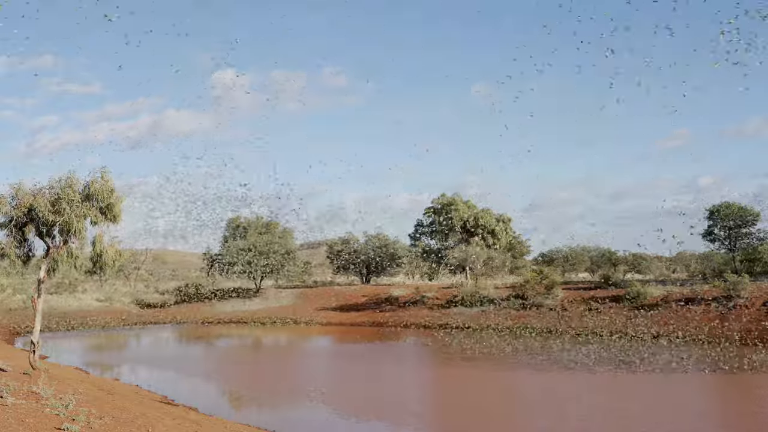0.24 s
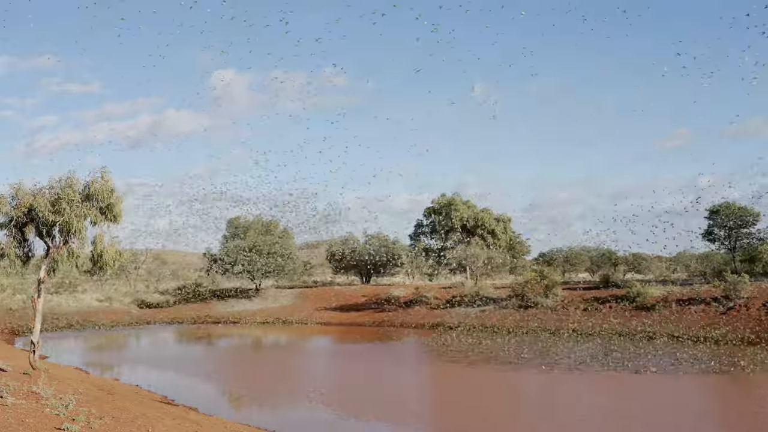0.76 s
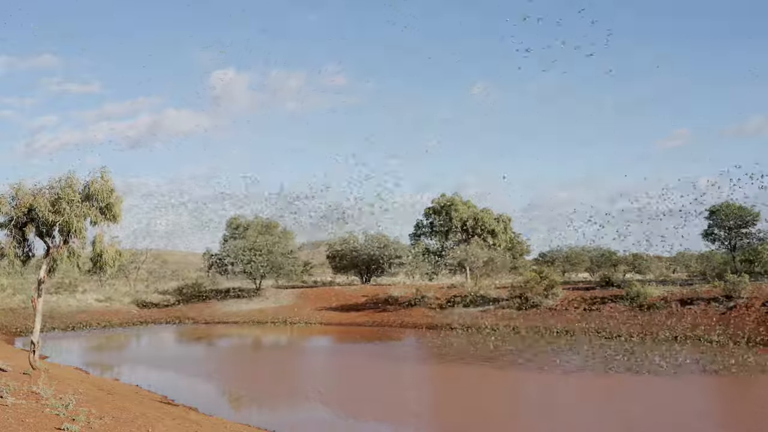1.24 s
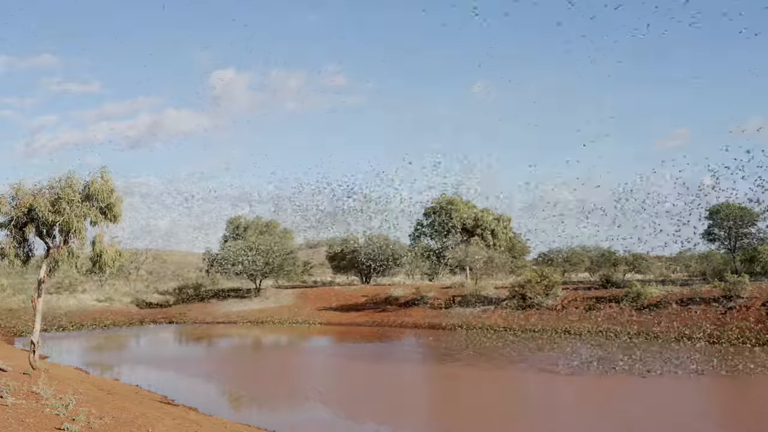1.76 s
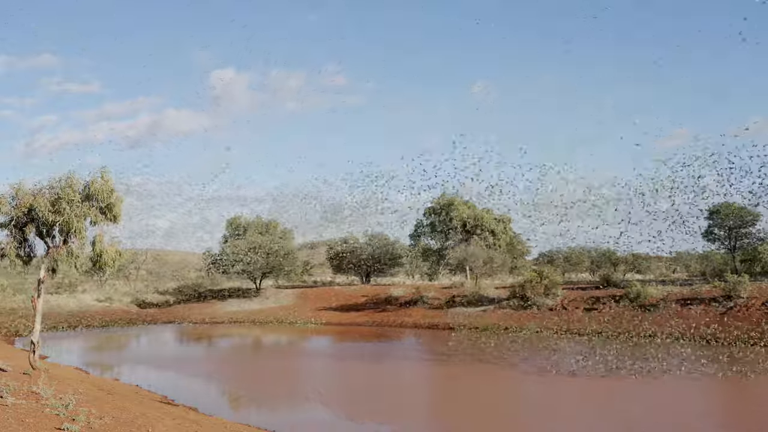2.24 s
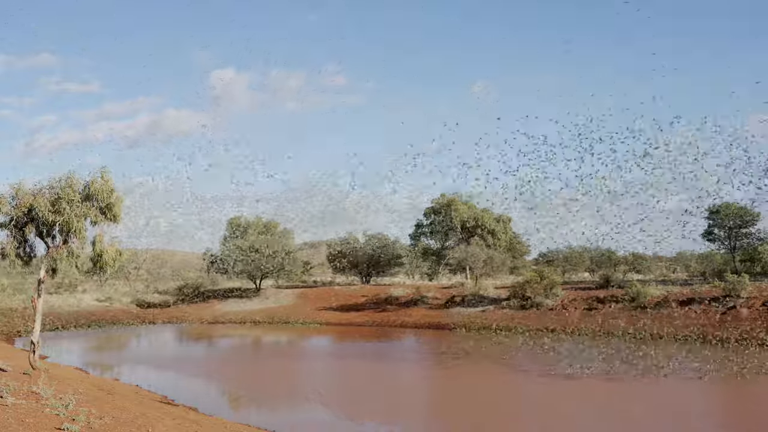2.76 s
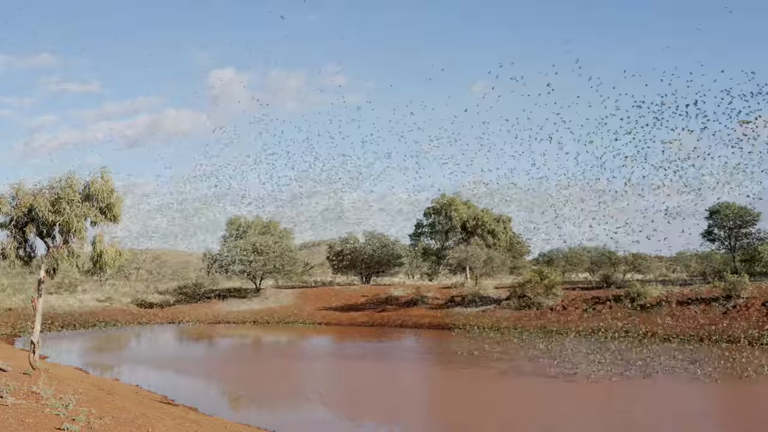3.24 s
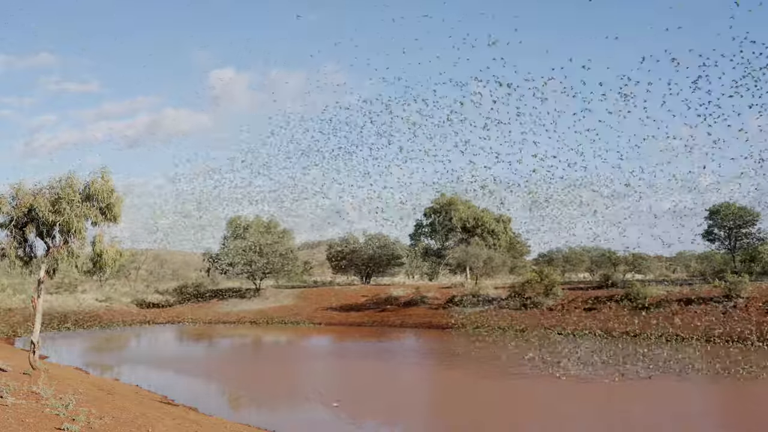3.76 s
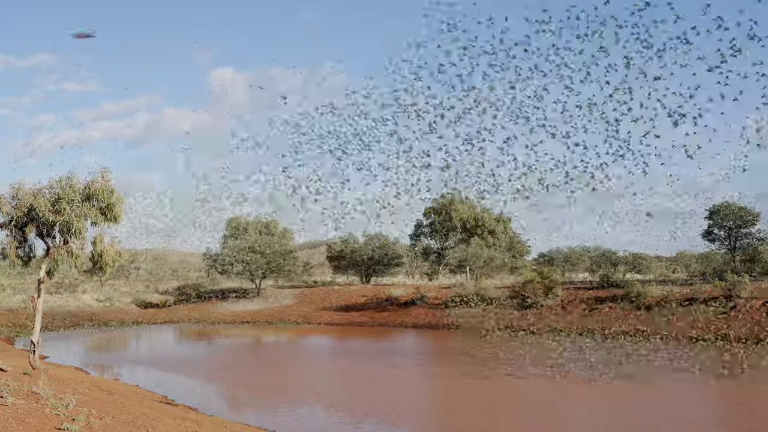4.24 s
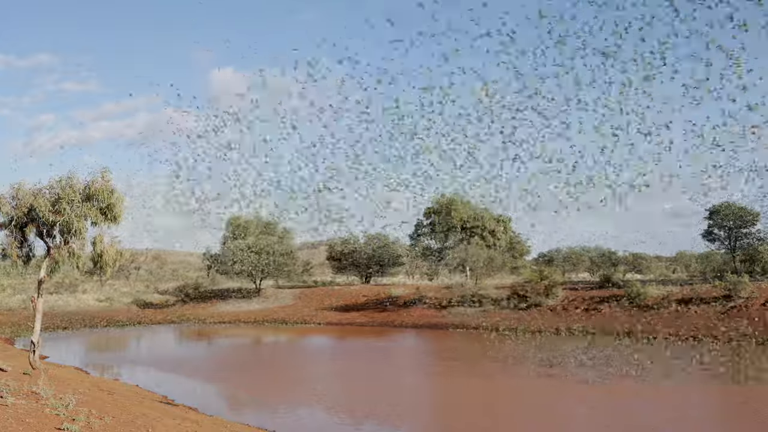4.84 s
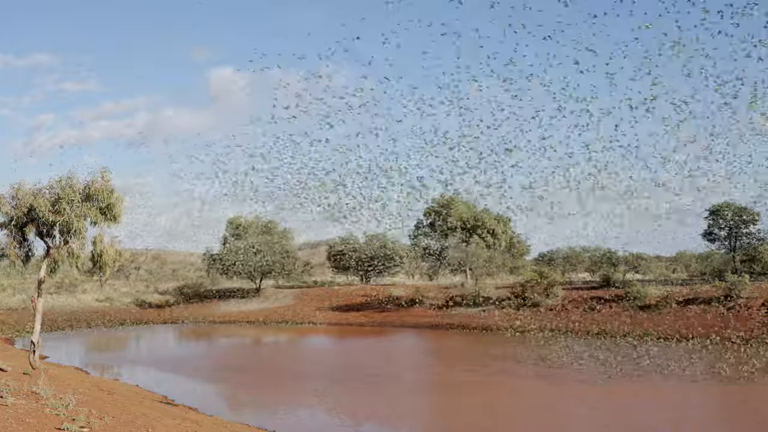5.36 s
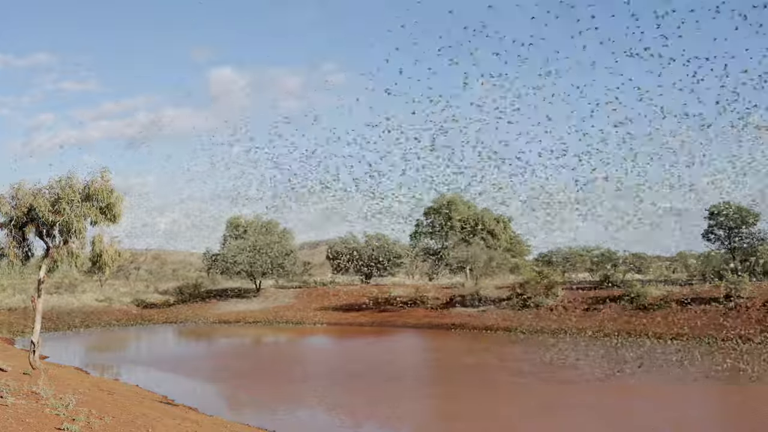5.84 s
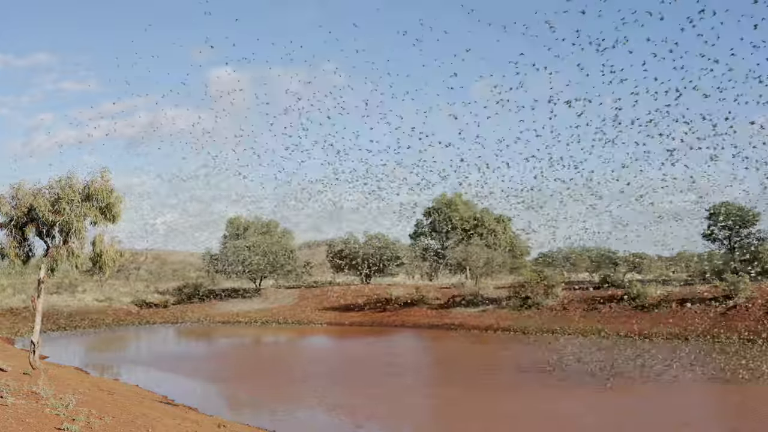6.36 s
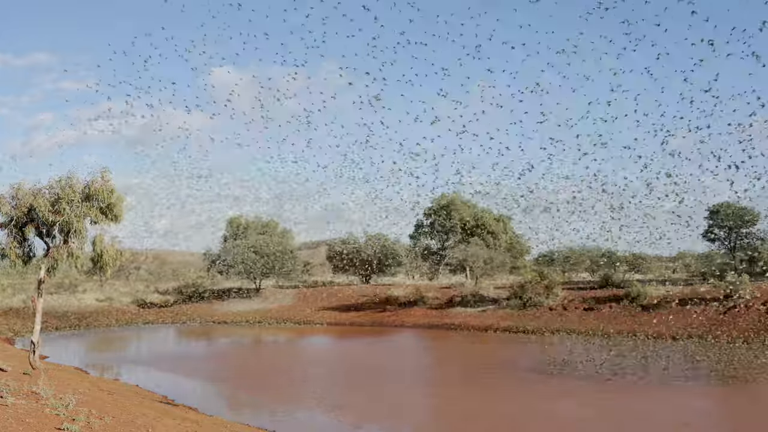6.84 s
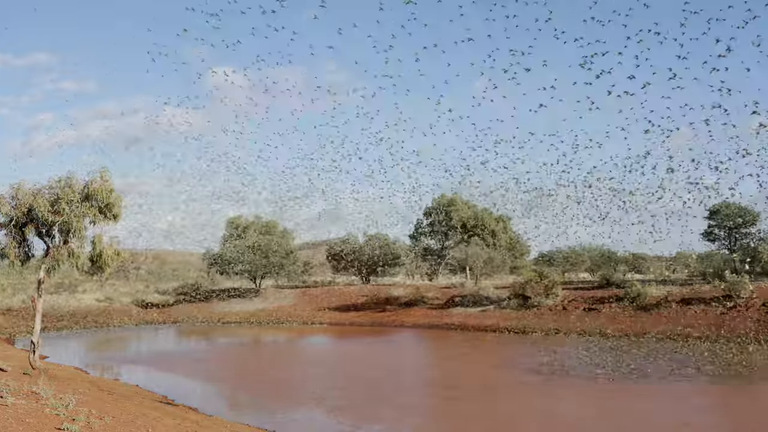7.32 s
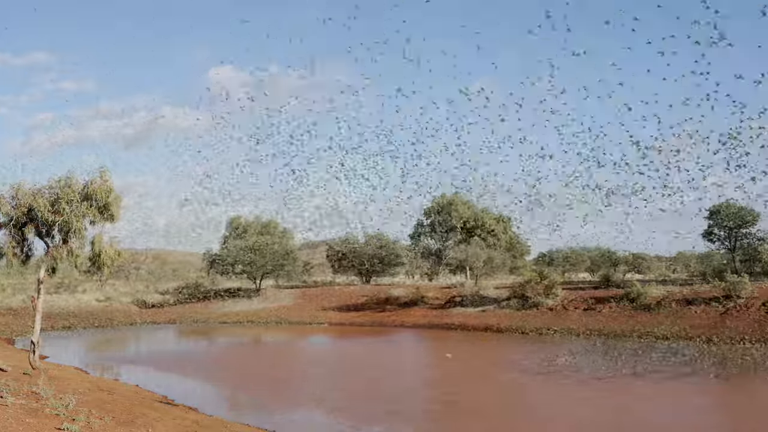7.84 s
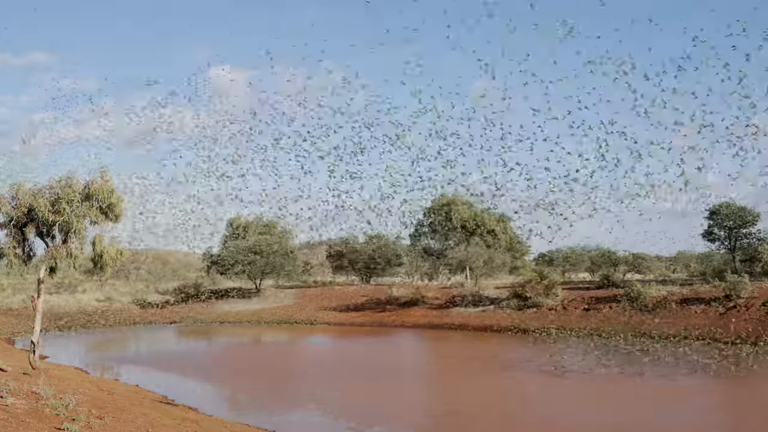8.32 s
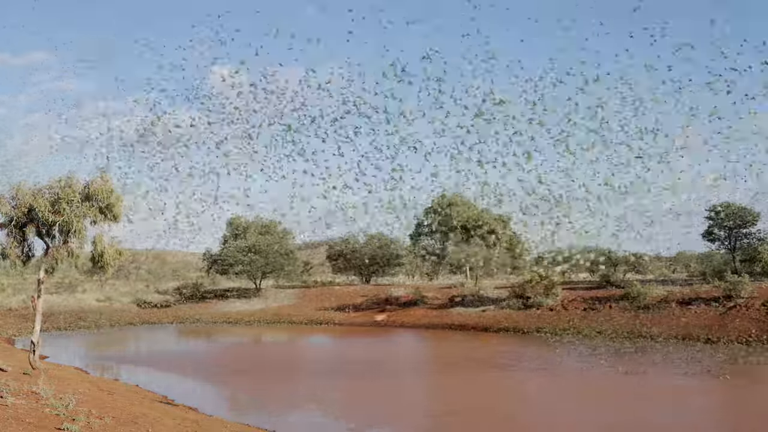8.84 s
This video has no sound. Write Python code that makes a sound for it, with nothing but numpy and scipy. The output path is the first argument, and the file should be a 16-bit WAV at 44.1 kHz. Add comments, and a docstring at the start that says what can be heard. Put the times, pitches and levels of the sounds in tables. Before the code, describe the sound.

Continuous outdoor flock sound, already full at the start and still going at the end. Deep rushing wing air lies below a dense, high, raspy twitter with no single call standing out. Bright nearby chirps flutter early, turn duller midway while thin feather hiss passes close, a short low whoosh swells overhead, then the chatter sharpens again. Dry open space, one fixed microphone.

```python
"""A huge flock of budgerigars wheels over a waterhole in open country.
Throughout, random puffs from wingbeats merge into a low rush and warbled whistles into a shrill chatter.
At first the chatter is bright and flickers as the nearer birds call; near 4 s it dulls as they turn away.
Feather ticks hiss strongly again about then, as the front of the flock banks close by.
Near 5 s the wing thud swells as the thickest part sweeps overhead; near 7 s the chatter brightens again."""
import sys
import numpy as np
from scipy import signal
from scipy.fft import rfft, irfft
from scipy.io import wavfile
from scipy.ndimage import uniform_filter1d

SR = 44100
rng = np.random.default_rng(int(sys.argv[2]) if len(sys.argv) > 2 else 0)


def put_to_file(sound):
    """Save the sound as 16-bit audio at rate SR, in the file named by the first command-line argument."""
    columns = np.atleast_2d(sound).T  # one column per channel
    safe = np.clip(columns, -1, 1)
    whole_steps = np.round(safe * 32767)
    wavfile.write(sys.argv[1], SR, whole_steps.astype(np.int16))


N = 400869  # length [samples]

# Spectrum of air pushed by the wings, thud and softer swish: (frequency [Hz], relative density [dB per Hz])
WING_SPECTRUM = [(12, -26), (22, -18), (32, -1.5), (41, -6), (60, 1), (100, -4.5), (160, -11.5), (250, -20),
                 (370, -26.5), (520, -25.5), (700, -31.5), (1000, -40), (1600, -42.5), (4000, -54.5)]
# Spectrum of the thin hiss of feathers: (frequency [Hz], relative density [dB per Hz])
FEATHER_SPECTRUM = [(5000, -6), (9000, 0), (12500, 5), (15500, -5)]
# Loudness of the whole chorus: (time [s], level [dB])
CHORUS_LEVEL = [(0, -28), (.7, -29), (1.5, -28.5), (2.9, -28), (3.6, -29), (4.3, -29), (5.2, -29.5),
                (6, -29), (7.3, -28.5), (8, -29), (9, -28.5)]
# Spectrum of the chorus, strongest about the call pitch: (frequency [Hz], relative density [dB per Hz])
CHORUS_SPECTRUM = [(700, -18), (1300, -20.5), (1850, -9.5), (2150, -9.5), (2600, -2.1), (3050, -1),
                   (3450, -0.8), (3750, -4.5), (4100, -10), (5300, -11), (6700, -9.5), (8000, -20.5),
                   (10500, -37.5), (15500, -52)]
# Spectrum of nearer birds, which keep their upper overtones: (frequency [Hz], relative density [dB per Hz])
NEAR_SPECTRUM = [(1000, -27), (2000, -16), (2700, -5.5), (3450, -0.5), (4200, -6.5), (5400, -3),
                 (6700, 0.5), (7200, -2), (8000, -9.5), (10000, -17.5), (12500, -27), (15500, -32)]
# Nearness of the closest birds as the flock wheels, before flurries: (time [s], relative level [dB])
NEARNESS_LEVEL = [(0, -1), (.7, 2.3), (1.1, 1), (1.6, 4.5), (2.0, 2.5), (2.35, 5), (2.6, 0.5), (3.2, 2.7),
                  (3.7, 0.4), (4.2, -4), (5.3, -3.2), (6.4, -3), (6.9, 0.5), (7.5, -0.5), (8.2, -1),
                  (9.05, -1.2)]

CALL_HZ, CALL_S = 3112, .06  # central pitch and length of a chirp
BANK_S, BANK_WIDTH_S, BANK_DB = 4.1, 0.49, 6  # the front of the flock banks close by
PASS_S, PASS_WIDTH_S, PASS_DB = 5.18, 0.19, 2.6  # the thickest part of the flock sweeps overhead
FLURRY_SLOW_HZ, FLURRY_FAST_HZ = 3.4, 9.2  # band of rates of the chance flurries
FLURRY_DEPTH_DB = 1.32  # rms depth of the flurries
EDGE_HZ = 15720  # upper band limit


def gain_of(db):
    """Level definition: an amplitude ratio is ten to the power of dB / 20."""
    return 10 ** (np.asarray(db) / 20)


def evened(x):
    """Normalization: division by the root mean square gives unit rms."""
    return x / np.sqrt(np.mean(x ** 2) + 1e-20)


def steadied(x, window_s=.2):
    """Averaging of many alike sources: division by the running rms removes slow swells."""
    power = abs(uniform_filter1d(x ** 2, int(window_s * SR)))
    return x / np.sqrt(power + 1e-12)


def along(curve):
    """Linear interpolation: a (time [s], level [dB]) curve becomes dB for every sample."""
    return np.interp(np.arange(N) / SR, *np.transpose(curve))


def coloured(x, points):
    """Spectral shaping: whitening a dense sound, then weighting it by the points, at unit rms."""
    spectrum, hz = rfft(x), np.fft.rfftfreq(N, 1 / SR)
    f, db = np.transpose(points)
    own = np.sqrt(abs(uniform_filter1d(abs(spectrum) ** 2, size=400)) + 1e-9)
    low_end = 1 / (1 + (f[0] / (hz + 1)) ** 4)
    high_end = 1 / (1 + (hz / f[-1] / 2) ** 4)
    target = gain_of(np.interp(np.log(hz + 1), np.log(f), db))
    return evened(irfft(spectrum / own * low_end * high_end * target, N))


def wander(step_size=24):
    """Random modulation: normal values every step_size samples, joined by straight lines."""
    knots = rng.standard_normal(N // step_size + 2)
    return np.interp(np.arange(N) / step_size, np.arange(len(knots)), knots)


def flurries():
    """Band-limited random modulation: noise between two rates gives surges in dB, several each second."""
    hz = np.fft.rfftfreq(N, 1 / SR)
    above_slow = 1 / (1 + (FLURRY_SLOW_HZ / (hz + 1e-3)) ** 4)
    below_fast = 1 / (1 + (hz / FLURRY_FAST_HZ) ** 4)
    noise = rfft(rng.standard_normal(N))
    return FLURRY_DEPTH_DB * evened(irfft(noise * above_slow * below_fast, N))


def wings(strokes_per_s=9000, rush_db=-17.5, swish_db=-17, thud_hz=230):
    """Superposition of impulses: random puffs of air merge into a swelling thud and a steady swish."""
    strokes = rng.standard_normal(N) * (rng.random(N) < strokes_per_s / SR)
    puffs = coloured(strokes, WING_SPECTRUM)
    thud = signal.sosfiltfilt(signal.butter(3, thud_hz, fs=SR, output="sos"), puffs)
    swish = puffs - thud
    swell_db = PASS_DB / (1 + ((np.arange(N) / SR - PASS_S) / PASS_WIDTH_S) ** 2)
    rush = gain_of(rush_db + swell_db) * steadied(thud, window_s=.35)
    return rush + gain_of(swish_db) * swish


def feathers(nearness_db, hiss_db=-62, follow=.9, flutter_db=2.5, ticks_per_s=3200):
    """Shot noise: tiny random feather ticks make a fluttering hiss, boosted as the flock banks."""
    ticks = rng.standard_normal(N) * (rng.random(N) < ticks_per_s / SR)
    flutter = gain_of(flutter_db * wander(step_size=600))
    banking_db = BANK_DB * np.exp(-((np.arange(N) / SR - BANK_S) / BANK_WIDTH_S) ** 2)
    level = gain_of(hiss_db + follow * nearness_db + banking_db)
    return level * flutter * coloured(ticks, FEATHER_SPECTRUM)


def chirps(spread_db, overtone_db, pitch_spread=.15, arch=.12, warble=.025, warble_hz=130,
           rasp=.012, count=400):
    """Frequency modulation: a string of arched, warbled, rough whistles, each with three overtones."""
    length, pitch, slide, speed, nearness = rng.uniform(-1, 1, (count, 5)).T
    starts = np.cumsum(CALL_S * 2 ** length) - 1  # the string begins before the scene [s]
    t = np.arange(N) / SR
    place = np.interp(t, starts, np.arange(count))
    call = place.astype(int)  # which call sounds
    u = place - call  # how far along it is, 0 to 1
    hump = 4 * u * (1 - u)
    contour = arch * (hump - 2 / np.pi + slide[call] * (u - .5))
    trill = warble * np.sin(np.float32(2 * np.pi * warble_hz * (2 ** speed)[call] * t))
    roughness = rasp * wander()
    hz = CALL_HZ * np.exp(pitch_spread * pitch[call] + contour + trill + roughness)
    phase = np.float32(2 * np.pi * (np.cumsum(hz) / SR % 1))
    # each higher harmonic changes by overtone_db
    voice = sum(float(gain_of(overtone_db * k)) * np.sin((k + 1) * phase) for k in range(4))
    return voice * hump * gain_of(spread_db * nearness)[call]


def chorus(spread_db, overtone_db, count):
    """Superposition: independent strings of calls add, at unit rms."""
    return evened(sum(chirps(spread_db, overtone_db) for _ in range(count)))


def far_chatter(far_db=0, blur_db=7.5):
    """Incoherent summation: chirps lie over noise, the countless distant calls blurred into a shrill band."""
    blur = gain_of(blur_db) * rng.standard_normal(N)
    voices = chorus(spread_db=0.5, overtone_db=-0.5, count=10) + blur
    level = gain_of(far_db + along(CHORUS_LEVEL))
    return level * steadied(coloured(voices, CHORUS_SPECTRUM), window_s=0.37)


def near_chatter(nearness_db, near_db=-35.5, rasp_db=-2):
    """Amplitude modulation: flurries vary the fewer, brighter, raspy chirps of the nearer birds."""
    rasp = gain_of(rasp_db) * rng.standard_normal(N)
    voices = chorus(spread_db=2.5, overtone_db=-7.0, count=7) + rasp
    level = gain_of(near_db + nearness_db)
    return level * steadied(coloured(voices, NEAR_SPECTRUM), window_s=0.095)


def scene():
    """Linear superposition: one nearness governs both the feather hiss and the bright chirps."""
    nearness_db = along(NEARNESS_LEVEL) + flurries()
    background = wings() + feathers(nearness_db)
    chatter = far_chatter() + near_chatter(nearness_db)
    return (background + chatter)[None]


def record(dry, fade_s=0.0023):
    """Band limitation: a linear-phase low-pass follows a very short fade at both ends."""
    samples_to_end = np.minimum(np.arange(N), np.arange(N)[::-1])
    fade = np.minimum(samples_to_end / (fade_s * SR), 1)
    low_pass = signal.firwin(1023, EDGE_HZ, window=("kaiser", 9), fs=SR)
    return signal.oaconvolve(dry * fade, low_pass[None], "same")


dry = scene()
out = record(dry)
put_to_file(out)
```